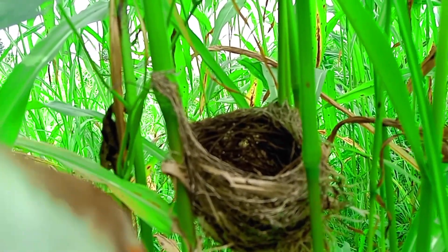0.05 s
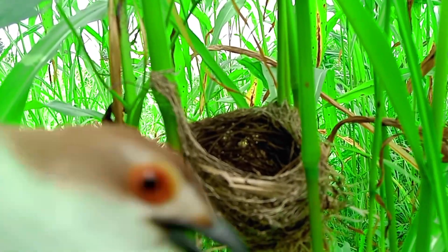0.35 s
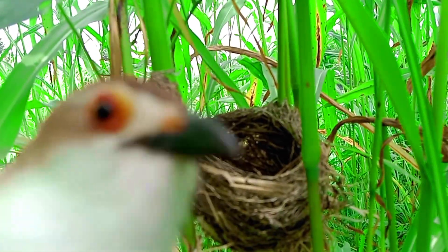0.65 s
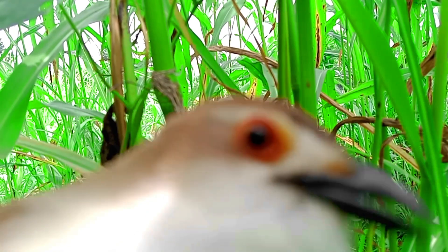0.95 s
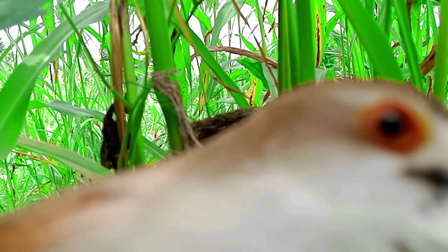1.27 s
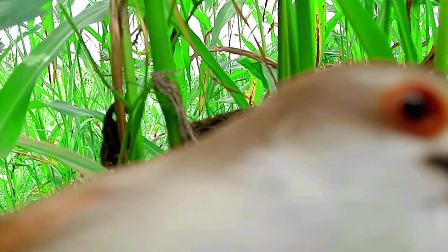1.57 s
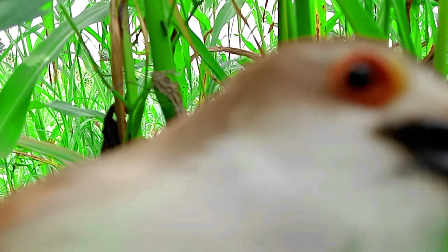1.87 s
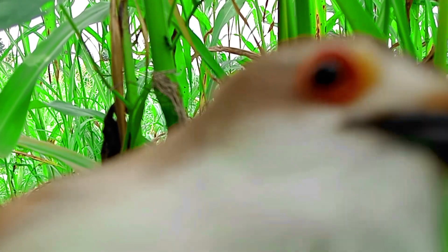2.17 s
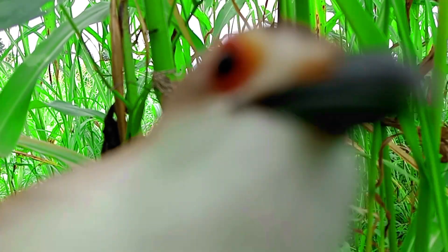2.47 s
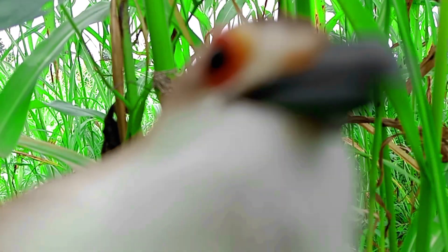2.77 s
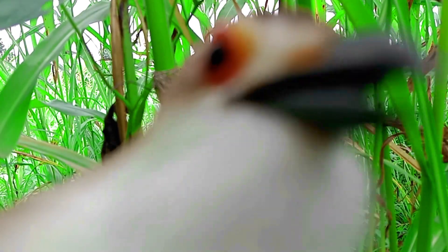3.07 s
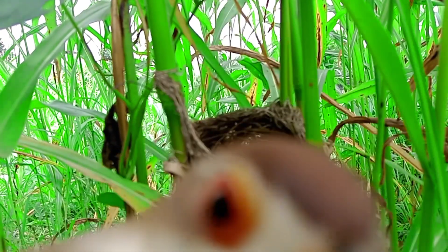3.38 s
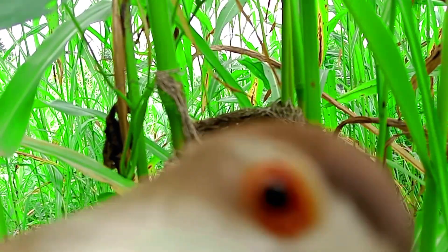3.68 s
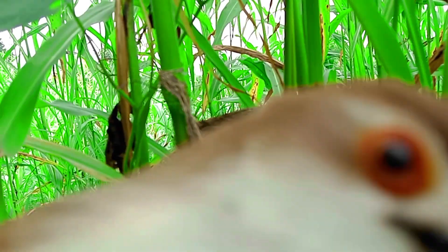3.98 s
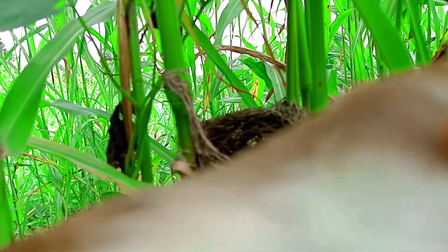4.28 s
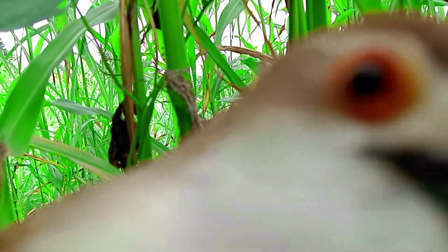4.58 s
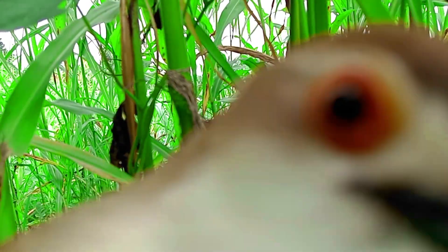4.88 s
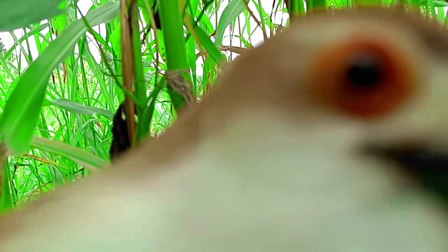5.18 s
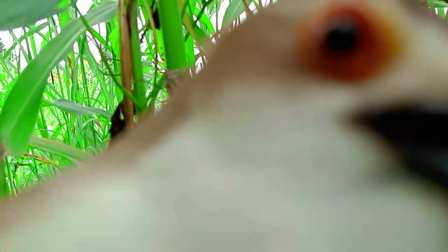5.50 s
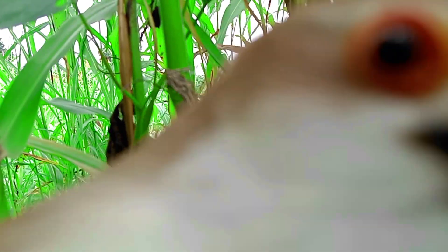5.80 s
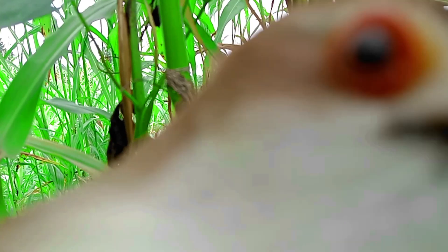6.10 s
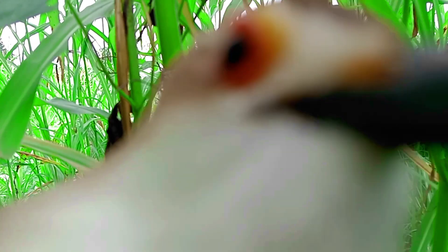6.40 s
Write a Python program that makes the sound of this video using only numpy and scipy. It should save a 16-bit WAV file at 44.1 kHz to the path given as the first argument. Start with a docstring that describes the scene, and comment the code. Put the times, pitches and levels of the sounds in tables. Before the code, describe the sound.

In quiet tall grass, one very close bird sings two similar phrases, each moving from hoarse ticks and bright chirps through piping notes and a descending twitter to loud, pure, gliding whistles. Between the phrases come short single chirps, a brief soft rustle of leaves and the faint, high, repeated call of a distant bird. The near song is clear and almost dry.

```python
"""In tall grass, a babbler sings two phrases right beside a camera: chips, churrs, chirps, piping notes,
a falling twitter and loud slurred whistles, each a syrinx buzz that the throat narrows toward one tone.
A small bird farther off repeats a thin, high motif. Leaves rustle as the singer shifts on its perch,
and the stems scatter each note over a faint outdoor hush."""
import sys
import numpy as np
from scipy import signal
from scipy.fft import rfft, irfft, next_fast_len
from scipy.io import wavfile
from scipy.ndimage import map_coordinates

SR = 44100
rng = np.random.default_rng(int(sys.argv[2]) if len(sys.argv) > 2 else 0)


def inscribe(sig):
    """Save sig as 16-bit PCM at rate SR to the path in sys.argv[1].

    A 1-D sig is mono; a 2-D sig holds one channel per row.
    Samples are clipped to [-1, 1] before scaling.
    """
    pcm = np.round(np.clip(np.atleast_2d(sig).T, -1, 1) * 32767)
    wavfile.write(sys.argv[1], SR, pcm.astype(np.int16))


N = 284445
TIME = np.arange(N) / SR

# The repertoire of gliding shapes that the chirp and whistle rows call on.
# Each row: seconds into the unstretched note, pitch in Hz, effort in dB.
ZIGZAG = [(0, 3350, -3), (.016, 3376, 0.5), (.024, 2768, 3.5), (0.035, 1732, -4.5), (.043, 2767, 3.5),
          (.05, 2800, 0), (0.074, 2430, 1), (.085, 1421, -1.5)]
HOOK_DOWN = [(0, 2596, 3.5), (0.012, 2737, -8), (.024, 2100, 1), (.032, 1314, 5)]
HOOK_UP = [(0, 880, -3.5), (.007, 1446, -5), (.015, 1944, 0.5), (0.025, 3113, 2.5), (.03, 3250, -2.5),
           (0.043, 3214, 0)]
VALLEY = [(0, 1700, 6.5), (.012, 2630, -3.5), (0.031, 2250, -0.5), (0.071, 2079, 1), (0.101, 2450, -4),
          (.13, 3101, -3.5), (.158, 3230, 3.5)]
SWOOP = [(0, 3936, -3), (.015, 4006, -4), (.03, 3700, 2.5), (.047, 3030, 4.5), (.075, 2640, -1.5),
         (.1, 2650, -3.5), (.122, 2878, 0.5), (.134, 2747, -4.5)]
ARCH = [(0, 3050, 0), (.012, 3280, -2), (0.036, 3540, 2.5), (0.064, 3920, 1), (0.089, 3700, 1),
        (.12, 3220, -2.5), (0.147, 2560, -11)]
LEAP = [(0, 2473, -3.5), (0.017, 2390, -3), (.047, 2155, 4), (0.059, 2478, 6.5), (0.074, 3650, 1),
        (.09, 3975, -0.5), (0.105, 4100, -1), (.115, 4380, -1)]
BOW = [(0, 2980, -9.5), (0.017, 2913, 2.5), (0.058, 3135, 3), (.105, 2928, -1.5), (.135, 2690, -3),
       (0.159, 2267, -8.5)]


def babbler(low_cut_hz=750):
    """The lead voice, in six kinds of note; so small a bill radiates no bass."""
    song = chips() + churrs() + chirps() + pipes() + twitter() + whistles()
    return filtered(song, lambda hz: 1 - np.exp(-(hz / low_cut_hz) ** 4))


def whistles():
    """Loud, pure slurs; the same five close each phrase."""
    # Each row: start in seconds, length in seconds, pitch ratio, level in dB, shape.
    cues = [(1.421, .16, 1, -16, VALLEY), (1.635, 0.13, 1.012, -13, SWOOP),
            (1.818, 0.14, 1.015, -8.5, ARCH), (2.005, 0.12, 1.01, -15.5, LEAP),
            (2.166, 0.15, 1.01, -15, BOW), (5.096, 0.15, .99, -15, VALLEY), (5.3, .134, .99, -13.5, SWOOP),
            (5.488, 0.15, 1.0025, -10, ARCH), (5.684, 0.11, 1, -14.5, LEAP), (5.848, 0.17, 1, -17.5, BOW)]
    pure = [-38, 0, -54.5, -37.5, -64, -33.5, -59.5, -34, -67, -42.5]  # syrinx harmonics in dB, from the first up
    return sing([slur(*row) for row in cues], pure, jitter=.0005, shimmer_db=0,
                rasp_db=-58, reedy_db=1, scoop=.27, onset_db=-14, catch=.07)


def pipes(hold_s=.007, drop_s=.0091):
    """Soft piping swells toward mid-note while the pitch drops, settles and sags."""
    # Each row: start in seconds, length in seconds, opening, held and end pitch in Hz, level in dB.
    cues = [(0, 0.013, 3345, 3400, 3400, -17), (0.716, 0.043, 3920, 2925, 2780, -26.5),
            (.809, 0.066, 3590, 2912, 2600, -22.5), (.928, 0.091, 3480, 2930, 2525, -16.5),
            (2.471, 0.03, 4156, 3180, 2654, -25), (2.707, 0.028, 5200, 3397, 3000, -48),
            (3.179, 0.038, 3997, 3007, 2643, -15.5), (3.61, .034, 4203, 3110, 2825, -17.5),
            (4.421, 0.071, 3753, 2930, 2578, -11.5), (4.552, 0.077, 3730, 2904, 2624, -12.5)]
    # Two pipes run together: start in seconds, length in seconds, pitch ratio, level in dB.
    twin_cue = (4.212, 0.176, 1, -11)
    # Their shape. Each row: seconds into the note, pitch in Hz, effort in dB.
    twin_shape = [(0, 3965, -14.5), (.008, 3810, -10), (.022, 3108, -2.5), (.045, 2867, 1),
                  (.088, 2736, -0.5), (.101, 2936, -10), (.112, 3110, -1.5), (.14, 2848, 1),
                  (.174, 2604, -3)]
    soft = [-40.5, 0, -60.5, -46.5, -74, -51.5, -71.5, -47.5, -78.5, -54]  # syrinx harmonics in dB, from the first up
    notes = []
    for start, length, start_hz, held_hz, end_hz, db in cues:
        i, t, progress = clock(start, length)
        hz = held_hz + (start_hz - held_hz) * np.exp(-np.maximum(t - hold_s, 0) / drop_s)
        hz += (end_hz - hz) * progress ** 2.3
        swell_db = 3 * (np.sin(np.pi * progress) - .8)
        notes.append((i, hz, db + swell_db, envelope(t, attack=.32 * length, release=.0098)))
    notes.append(slur(*twin_cue, twin_shape))
    return sing(notes, soft, jitter=.0005, shimmer_db=0,
                rasp_db=-62, reedy_db=8, scoop=.05, onset_db=-6, catch=.05)


def twitter(from_hz=850, rise_s=.013):
    """A falling run: each note flicks faintly up, then slides down with a brief push halfway."""
    # Each row: start in seconds, length in seconds, top and end pitch in Hz, level in dB.
    cues = [(1.065, .031, 6010, 3603, -25), (1.111, .029, 5700, 3570, -19), (1.158, .029, 5586, 3485, -20),
            (1.205, .031, 5190, 3244, -19), (1.254, .031, 4146, 2564, -19), (1.306, .035, 3323, 2183, -18),
            (1.361, 0.036, 3070, 2056, -17.5), (4.678, 0.027, 5604, 3650, -23),
            (4.72, .029, 5640, 3664, -24.5), (4.765, 0.032, 5320, 3474, -20),
            (4.812, 0.033, 5090, 3336, -19), (4.86, .031, 4130, 2377, -18.5),
            (4.913, .033, 3460, 2247, -19), (4.966, .036, 3045, 2125, -16),
            (5.023, 0.039, 2807, 1960, -16.5)]
    liquid = [-34.5, 0, -55.5, -37, -62.5, -38, -65.5, -42, -78, -47]  # syrinx harmonics in dB, from the first up
    notes = []
    for start, length, top_hz, end_hz, db in cues:
        i, t, _ = clock(start, length)
        rise = np.sin(np.pi / 2 * np.minimum(t / rise_s, 1)) ** 2
        fall = np.interp(t, [rise_s, length], [0, 1])
        push_db = np.interp(top_hz, [3000, 4300], [0, 6]) * np.exp(-((fall - .55) / .2) ** 2)
        effort_db = db - 9 * (1 - rise) + push_db
        hz = from_hz + (top_hz + (end_hz - top_hz) * fall - from_hz) * rise
        notes.append((i, hz, effort_db, envelope(t, attack=.0084, release=.003)))
    return sing(notes, liquid, jitter=.005, shimmer_db=.6, rasp_db=-48, reedy_db=3, scoop=0, onset_db=-4)


def chirps():
    """Sharp, bright zigzags and hooks of pitch."""
    # Each row: start in seconds, length in seconds, pitch ratio, level in dB, shape.
    cues = [(0.413, 0.081, 1.021, -15, ZIGZAG), (2.747, 0.025, .99, -21, HOOK_DOWN),
            (2.79, .041, 0.99, -21.5, HOOK_UP), (2.994, 0.03, 1.065, -19.5, HOOK_DOWN),
            (3.037, .044, 1, -15.5, HOOK_UP), (4.058, 0.084, 0.97, -15, ZIGZAG)]
    bright = [-35.5, 0, -42, -35.5, -68.5, -35.5, -73.5, -45.5, -61, -51]  # syrinx harmonics in dB, from the first up
    return sing([slur(*row) for row in cues], bright, jitter=.005, shimmer_db=1,
                rasp_db=-49, reedy_db=8, scoop=.25, onset_db=-17)


def chips():
    """Raspy ticks whose pitch tips over and plunges."""
    # Each row: start in seconds, length in seconds, opening and end pitch in Hz, level in dB.
    cues = [(0.231, .033, 3384, 1114, -21.5), (3.891, 0.03, 3386, 1183, -14.5)]
    sharp = [-45.5, 0, -16.5, 8, -27, -23, -34, -27, -46.5, -31.5]  # syrinx harmonics in dB, from the first up
    notes = []
    for start, length, start_hz, end_hz, db in cues:
        i, t, progress = clock(start, length)
        hz = end_hz + (start_hz - end_hz) * np.cos(np.pi / 2 * progress) ** 1.3
        notes.append((i, hz, db, envelope(t, attack=.032, release=.0071)))
    return sing(notes, sharp, jitter=.014, shimmer_db=3,
                rasp_db=-31.5, reedy_db=-1.5, scoop=0, onset_db=-6)


def churrs():
    """Hoarse notes, each one low arch of pitch."""
    # Each row: start in seconds, length in seconds, edge and top pitch in Hz, level in dB.
    cues = [(0.278, 0.044, 1123, 1926, -16.5), (3.935, 0.046, 1115, 1996, -14)]
    hoarse = [-38, 0, -30.5, -20, -40, -38, -44, -43, -50.5, -36.5]  # syrinx harmonics in dB, from the first up
    notes = []
    for start, length, edge_hz, top_hz, db in cues:
        i, t, progress = clock(start, length)
        hz = edge_hz + (top_hz - edge_hz) * np.sin(np.pi * progress)
        notes.append((i, hz, db, envelope(t, attack=.0015, release=.005)))
    return sing(notes, hoarse, jitter=.006, shimmer_db=.8,
                rasp_db=-38, reedy_db=4.5, scoop=0, onset_db=-10.5)


def slur(start, length, ratio, db, shape):
    """One gliding note: a shape stretched to length and transposed."""
    i, t, progress = clock(start, length)
    knots, hz, effort_db = np.transpose(sorted(shape))
    at = progress * knots[-1]
    gate = envelope(t, attack=.0099, release=.006)
    return i, ratio * glide(knots, hz, at), db + glide(knots, effort_db, at), gate


def sing(notes, harmonics, jitter, shimmer_db, rasp_db, reedy_db, scoop, onset_db, catch=.13):
    """The syrinx buzzes an octave below the sung tone; the throat picks out its second harmonic."""
    # Three tone curves. Each row: frequency in Hz, gain in dB.
    resonance = [(900, -17), (1500, -11), (2050, -1.5), (2400, -1.5), (2700, 0.5), (3000, 2.5), (3400, 1),
                 (3700, -1.5), (4200, 2.5), (4550, 0.5), (4850, -4), (5300, -6.5), (6000, -9.5)]  # the throat's lift on the sung tone
    throat = [(700, -7), (1500, -7), (3000, 10.5), (4600, -1), (5900, -7), (7000, -2.5), (8100, 1.5),
              (9000, -9), (10000, -16.5), (11200, -26.5), (12500, -33), (13500, -16.5), (15000, -33)]  # how throat and open bill pass the other harmonics
    rasp = [(400, -11.5), (1000, -1), (2500, 5.5), (4500, -5), (6000, -9.5), (8200, -4), (10000, -15.5),
            (12000, -31), (13500, -22.5), (15000, -41.5)]  # turbulence in the syrinx
    # Overtones beam forward and follow the turning bill. Each row: time in seconds, gain in dB.
    facing = [(.3, 2.5), (1.2, 8.5), (2.25, -0.5), (2.8, 5.5), (3.95, -3.5), (4.15, 7), (4.35, -4.5),
              (4.55, -7.5), (4.8, 2), (5.15, -6.5), (5.4, 1), (5.55, -6.5), (5.95, -7)]
    trill_hz, trill_db = trills()
    out, turbulence = np.zeros(N), amp(rasp_db) * noise(rasp)
    for i, hz, db, gate in notes:
        count, t = len(i), TIME[i] - TIME[i[0]]
        # The labia flap unevenly before they lock: the attack is weak, scoops up and catches in pitch.
        unsettled = np.exp(-(t / .0052) ** 2)
        db = db + along(resonance, hz) + trill_db[i] + shimmer_db * wobble(350, count)
        db += unsettled * (4 * wobble(600, count) + onset_db)
        waver = jitter * wobble(600, count)
        attack_bend = unsettled * (catch * wobble(1500, count) - scoop)
        hz = np.maximum((hz + trill_hz[i]) * (1 + waver + attack_bend), 300)
        phase = np.pi * np.cumsum(hz) / SR
        low_buzz_db = reedy_db * np.interp(hz, [1600, 2250], [1, 0])
        beam_db = automation(facing, TIME[i])
        # The fundamental leaks through in attacks and on the highest tones.
        leak_db = np.interp(hz, [4200, 5300], [0, 25]) + 36 * np.sqrt(unsettled) * (hz < 4200)
        tone = np.sin(2 * phase) + turbulence[i] * amp(beam_db + 19 * unsettled)
        for k, harmonic_db in enumerate(harmonics, 1):
            if k != 2:
                colour_db = along(throat, k * hz / 2) + (leak_db if k == 1 else low_buzz_db + beam_db)
                flutter_db = 3 * wobble(110, count)
                tone += amp(harmonic_db + colour_db + flutter_db) * (k * hz < SR) * np.sin(k * phase)
        out[i] += np.sqrt(2) * gate * tone * amp(db)
    return out


def trills():
    """Fast pitch swings in the slurs; the level dips on each upswing and swells on each downswing."""
    # Each row: start and end in seconds, beats a second, pitch swing in Hz, level swing in dB.
    cues = [(1.527, 1.582, 143, 130, 4), (1.871, 1.958, 78, 250, 2), (5.188, 5.248, 141, 120, 3.2),
            (5.534, 5.635, 78, 260, 4.2)]
    swing_hz, swing_db = np.zeros((2, N))
    for start, end, rate, hz, db in cues:
        gate = np.clip(np.minimum(TIME - start, end - TIME) / .0019, 0, 1)
        beat = gate * np.sin(2 * np.pi * rate * (TIME - start))
        swing_hz += hz * beat
        swing_db -= db * beat
    return swing_hz, swing_db


def far_bird():
    """Thin syllables climb in steps, dip and end in a quick downward flick; no two are quite alike."""
    # Each row: seconds from the final flick, length in seconds, opening and end pitch in Hz, trim in dB.
    motif = [(-.16, 0.042, 3250, 3795, -10), (-.122, 0.014, 4310, 4630, -6),
             (-.103, 0.016, 4730, 4864, 0.5), (-.085, .033, 5600, 5150, -2.5),
             (-.044, .04, 4034, 5014, -1.5), (-.003, 0.017, 7260, 4853, 2)]
    # Each row: time of the final flick in seconds, level in dB.
    repeats = [(2.291, -38), (2.588, -40.5), (2.895, -41), (3.191, -36), (3.503, -35.5), (3.814, -36),
               (6.424, -40.5)]
    out = np.zeros(N)
    for flick_s, level_db in repeats:
        for offset, length, start_hz, end_hz, db in motif:
            i, t, progress = clock(flick_s + offset, length)
            detune = rng.normal(0, .008) + .009 * wobble(250, len(i))
            hz = (start_hz + (end_hz - start_hz) * progress) * (1 + detune)
            flutter_db = 3 * wobble(110, len(i))
            gain = amp(level_db + db + flutter_db) * envelope(t, attack=.0075, release=.0055)
            out[i] += np.sqrt(2) * gain * np.sin(2 * np.pi * np.cumsum(hz) / SR)
    return out


def leaves():
    """Blades rub, crackle and flick, and the perch shudders as the bird shifts its weight."""
    # Steady stirring round the perch. Each row: time in seconds, level in dB.
    stir = [(0, -72.5), (1.3, -81), (2.7, -63.5), (5.2, -62.5), (6, -68), (6.45, -65.5)]
    # Single brushes. Each row: centre in seconds, level in dB, half-width in seconds.
    brushes = [(.01, -47.5, 0.021), (.525, -57.5, 0.025), (3.331, -52.5, 0.064), (3.482, -43.5, .0076),
               (3.588, -46, 0.0031), (3.66, -56, 0.081), (3.83, -60.5, 0.046)]
    # Noise colours. Each row: frequency in Hz, level in dB.
    leaf_colour = [(100, -42.5), (300, -21), (1000, -10.5), (2500, -8.5), (4500, -7), (6500, -3.5),
                   (8000, -7.5), (9200, -21), (11000, -27), (15000, -41), (17000, -75)]
    perch_colour = [(30, -20), (110, 6), (250, -8), (700, -9), (2000, -10), (4000, -42), (10000, -75)]
    bump = lambda centre, width: np.exp(-.5 * ((TIME - centre) / width) ** 2)
    crackle_db = 2 * wobble(35, N) + 3.5 * wobble(700, N) - 2.5
    rub = amp(automation(stir, TIME)) + sum(amp(db) * bump(s, width) for s, db, width in brushes)
    shudder = amp(-56) * bump(3.51, .035)
    return rub * amp(crackle_db) * noise(leaf_colour) + shudder * noise(perch_colour)


def scattered(x, linger, build_s):
    """Countless stems return the sound as a short, bright tail; linger scales its decay time."""
    # Each row: frequency in Hz, base time to fall 60 dB in seconds.
    decay = [(500, 0.063), (2500, 0.17), (5000, 0.16), (8000, 0.048), (14000, 0.026)]
    # Leaves throw back the treble. Each row: frequency in Hz, gain in dB.
    sheen = [(500, 1.5), (2000, 0.5), (3000, -0.5), (4500, 5), (6500, 12), (9000, 6), (14000, -11.5)]
    hz, t, bands = signal.stft(rng.standard_normal(SR // 2), SR, nperseg=256)
    fade = amp(-60 * t / (linger * along(decay, hz)[:, None])) * (1 - np.exp(-t / build_s))
    tail = signal.istft(bands * fade, SR, nperseg=256)[1]
    wet = signal.fftconvolve(x, tail / np.linalg.norm(tail))[:N]
    return filtered(wet, lambda f: amp(along(sheen, f)))


def outdoors():
    """A bed of soft moving air and a low drone that slowly swells."""
    # Each row: time in seconds, drone level in dB.
    swell = [(0, -96.5), (3.5, -88.5), (4.6, -80), (5.3, -70.5), (6.45, -71.5)]
    # Noise colours. Each row: frequency in Hz, level in dB.
    hush = [(20, -22), (45, -13), (70, -5), (105, 0), (160, -5), (280, -14.5), (700, -14.5), (1200, -18),
            (2500, -22.5), (5000, -26), (7800, -27), (9000, -44), (15000, -54)]
    drone_colour = [(25, -100), (38, -29), (49, -7.5), (57, -10), (70, -30.5), (110, -100)]
    drone = amp(automation(swell, TIME)) * noise(drone_colour)
    air = amp(-69.5 + wobble(6, N)) * noise(hush)
    return air + drone


def amp(db):
    """Decibels to gain."""
    return 10 ** (np.asarray(db) / 20)


def along(points, hz):
    """Read (Hz, value) points on a log frequency axis."""
    f, values = np.transpose(points)
    return np.interp(np.log(hz + 1), np.log(f), values)


def automation(points, t):
    """Read (seconds, value) points at the times t."""
    return np.interp(t, *np.transpose(points))


def wobble(rate, count):
    """A smooth random curve, rate knots a second."""
    knots = rng.standard_normal(int(count * rate / SR) + 4)
    return map_coordinates(knots, [np.arange(count) * rate / SR])


def filtered(x, response):
    """Equalise x by a gain that is a function of Hz."""
    size = next_fast_len(N + SR // 2)
    return irfft(rfft(x, size) * response(np.fft.rfftfreq(size, 1 / SR)), size)[:N]


def noise(colour):
    """Coloured noise of rms 1."""
    x = filtered(rng.standard_normal(N), lambda hz: amp(along(colour, hz)))
    return x / np.sqrt(np.mean(x ** 2) + 1e-20)


def glide(knots, values, t):
    """A smooth curve through the values that never overshoots them."""
    step = np.maximum(np.diff(knots), 1e-5)
    slope = np.diff(values) / step
    inner = 2 * np.maximum(slope[:-1] * slope[1:], 0) / (slope[:-1] + slope[1:] + 1e-12)
    tangent = np.r_[slope[0], inner, slope[-1]]
    place = np.interp(t, knots, np.arange(len(knots)))
    k = np.minimum(place.astype(int), len(slope) - 1)
    u = place - k
    bend = (tangent[k] - slope[k]) * (1 - u) - (tangent[k + 1] - slope[k]) * u
    return values[k] + step[k] * u * (slope[k] + (1 - u) * bend)


def clock(start, length):
    """A note's sample indices, the seconds into it and the share of it gone by."""
    i = np.arange(max(int(start * SR), 0), min(int((start + length) * SR), N))
    t = TIME[i] - TIME[i[0]]
    return i, t, t / length


def envelope(t, attack, release):
    """Rounded attack, hold, rounded release; times in seconds."""
    fade_in = np.sin(np.pi / 2 * np.clip(t / attack, 0, 1))
    fade_out = np.sin(np.pi / 2 * np.clip((t[-1] - t) / release, 0, 1)) ** 2
    return fade_in * fade_out


def scene():
    """The near singer is almost dry; the far bird comes with more of the grass."""
    near, far = babbler(), far_bird()
    near = near + amp(-26.5) * scattered(near, linger=.54, build_s=.003)
    far = amp(-2) * far + amp(-11.5) * scattered(far, linger=1.43, build_s=.002)
    return (near + far + leaves() + outdoors())[None]


def record(dry):
    """The camera keeps nothing above its band limit."""
    return filtered(dry[0], lambda hz: hz < 15700)[None]


dry = scene()
out = record(dry)
inscribe(out)
```